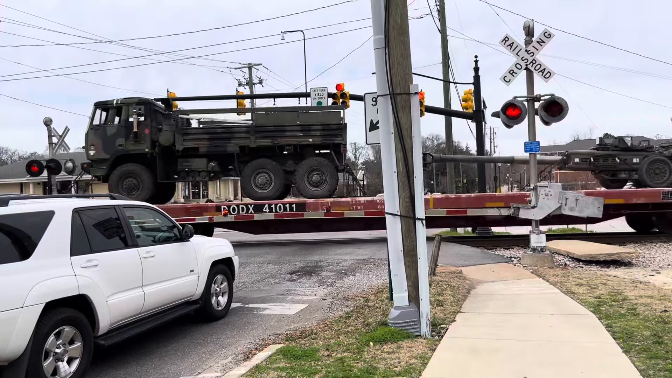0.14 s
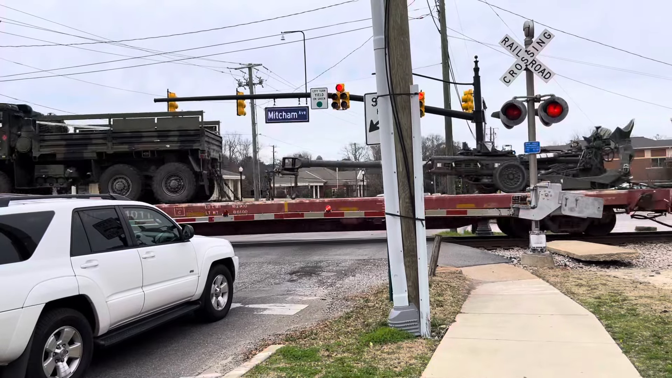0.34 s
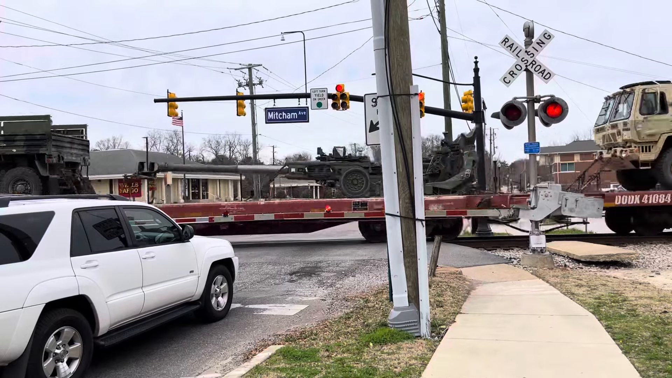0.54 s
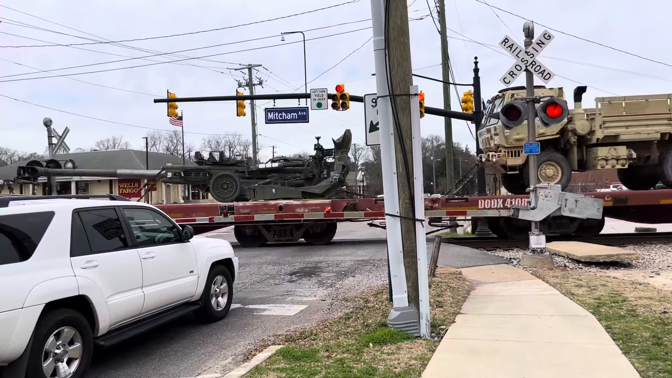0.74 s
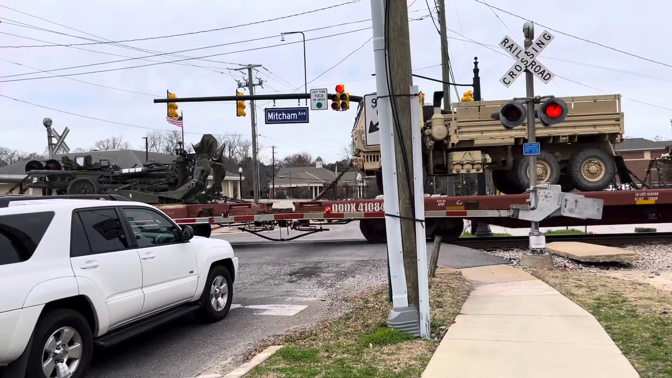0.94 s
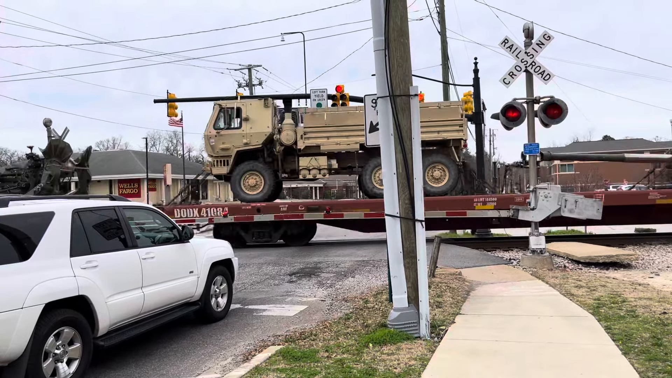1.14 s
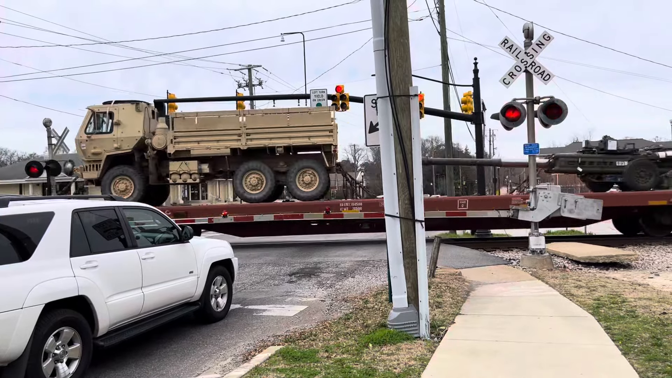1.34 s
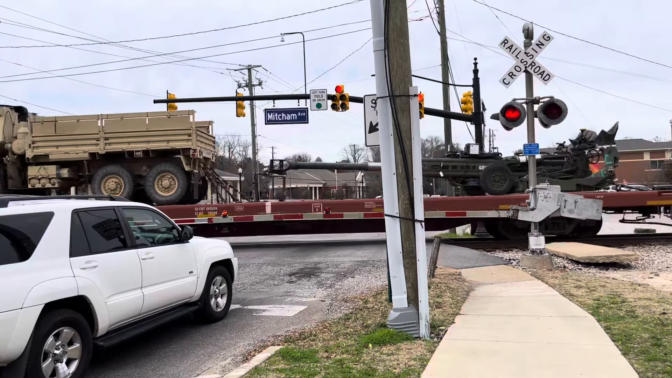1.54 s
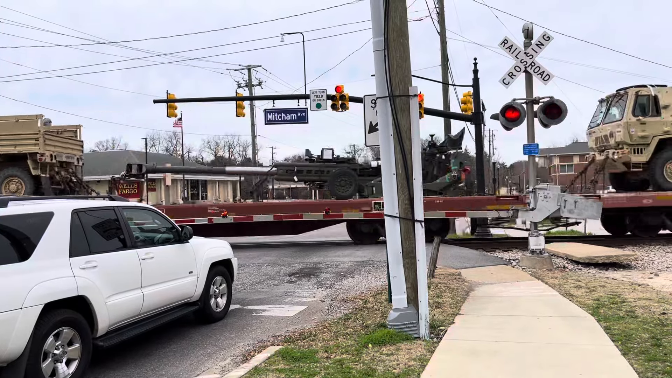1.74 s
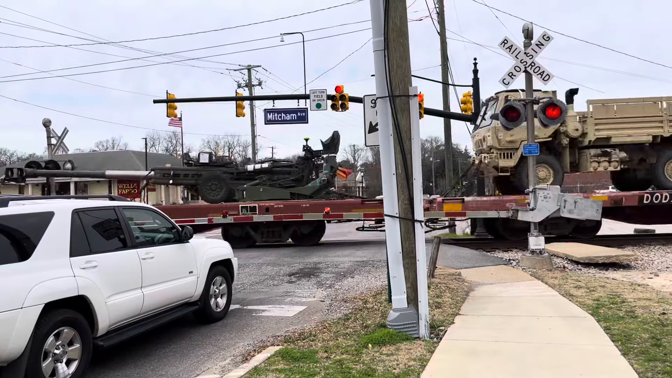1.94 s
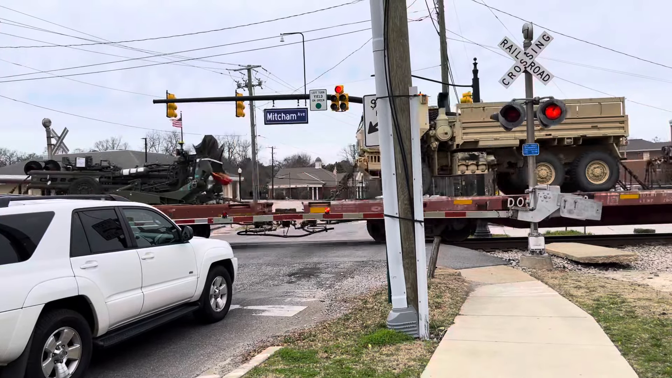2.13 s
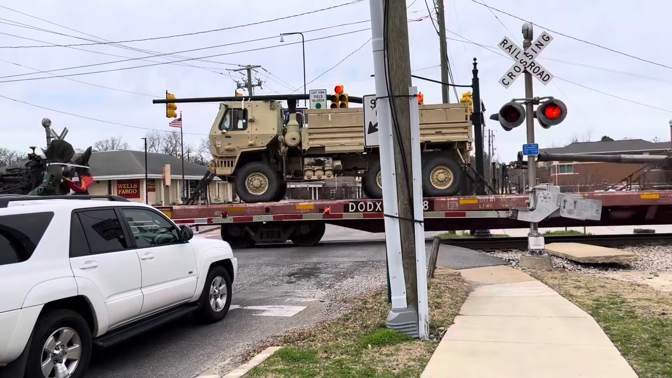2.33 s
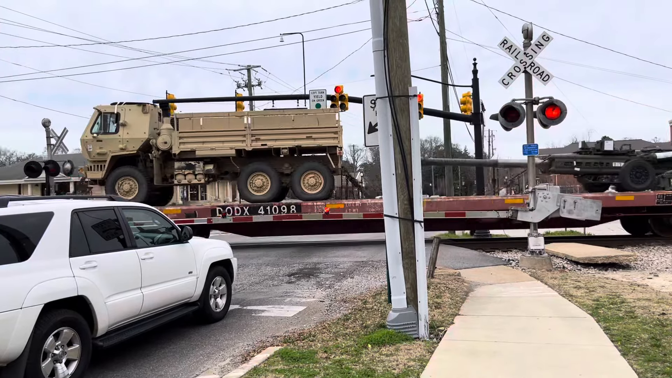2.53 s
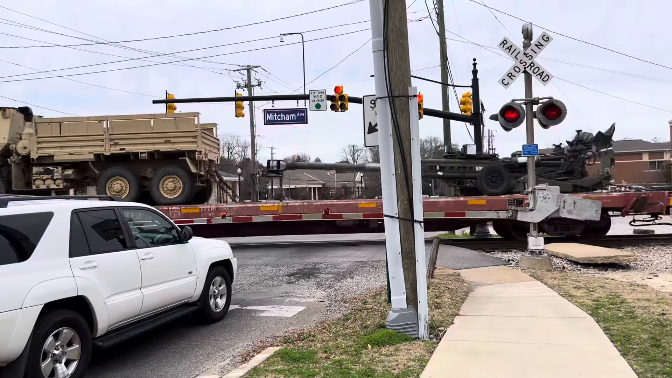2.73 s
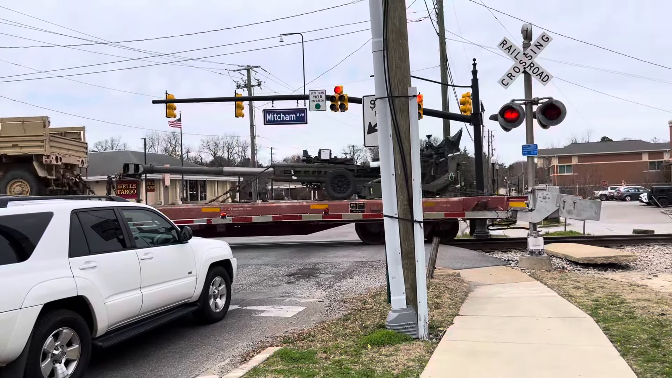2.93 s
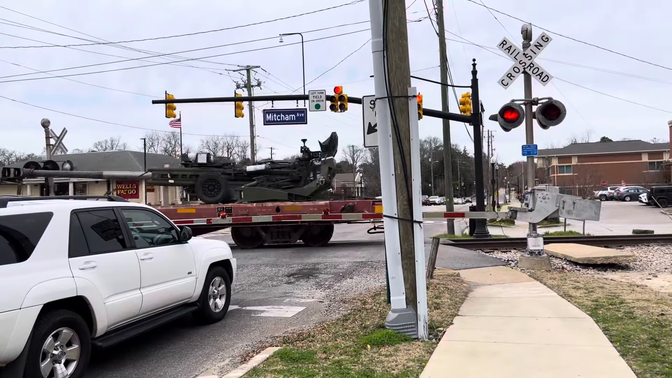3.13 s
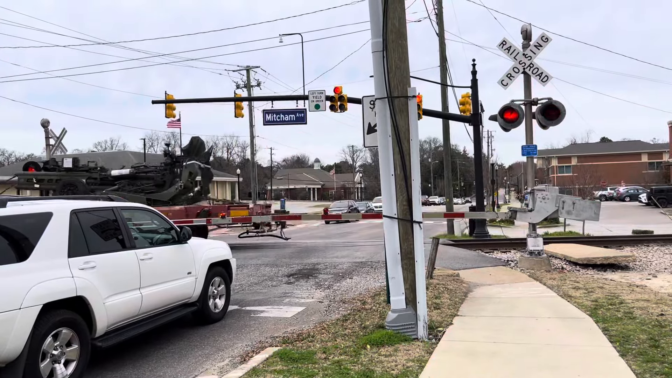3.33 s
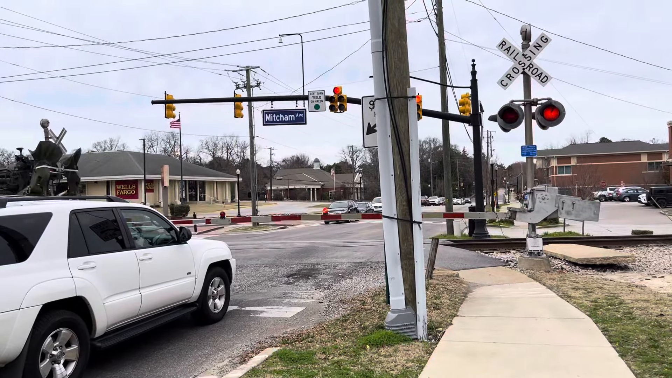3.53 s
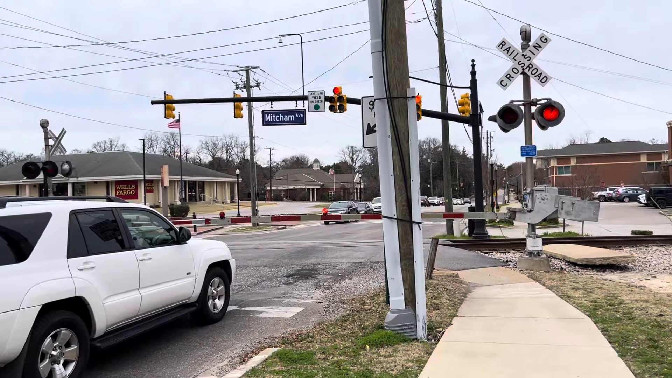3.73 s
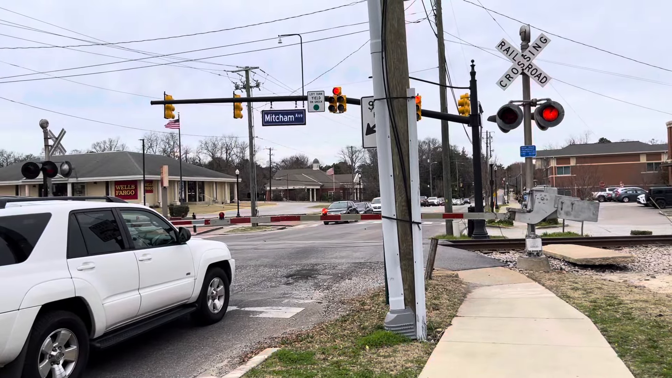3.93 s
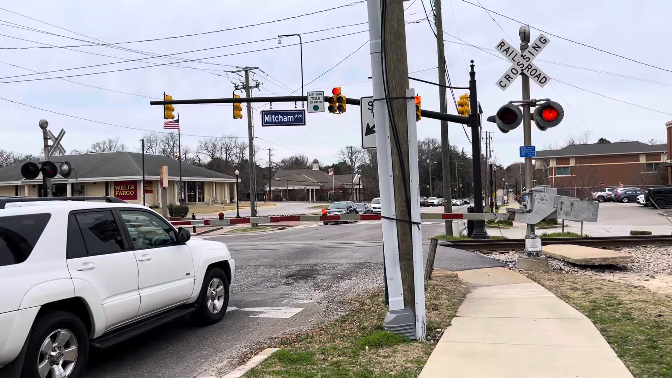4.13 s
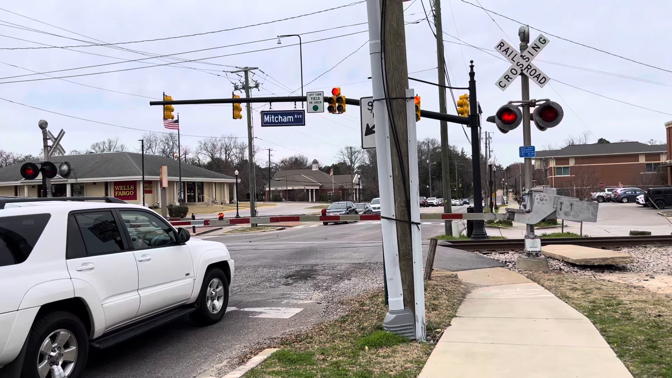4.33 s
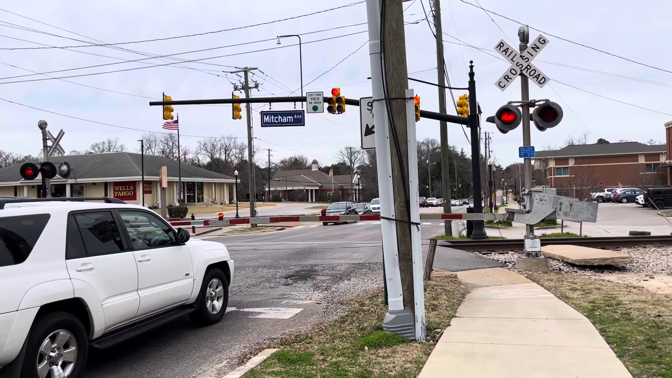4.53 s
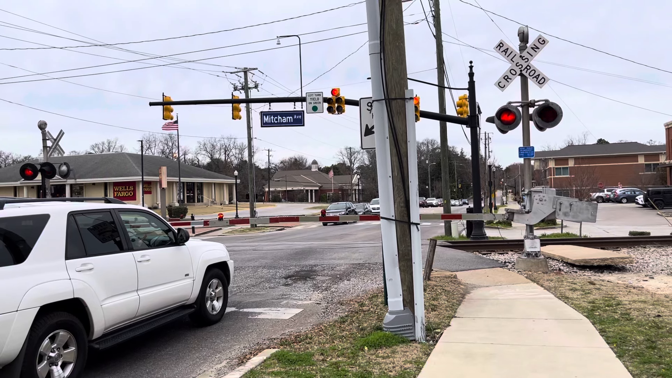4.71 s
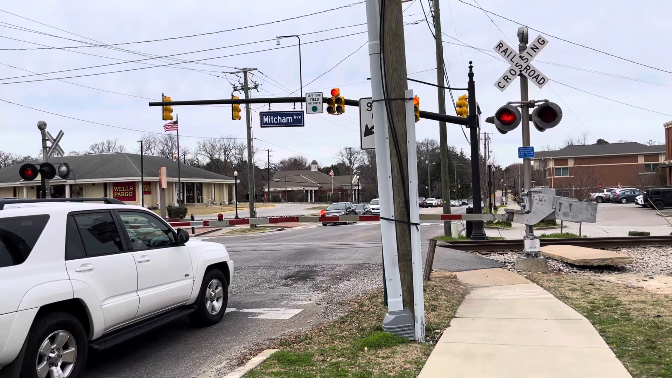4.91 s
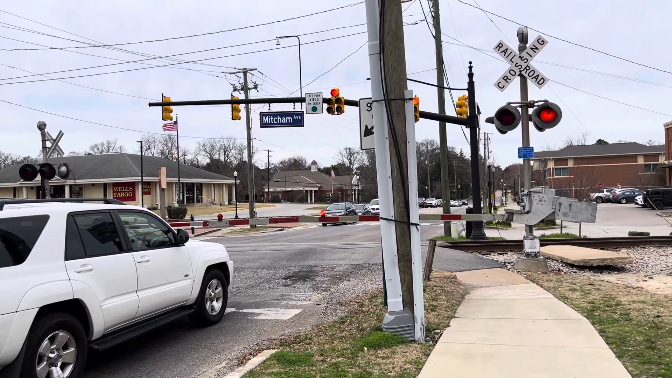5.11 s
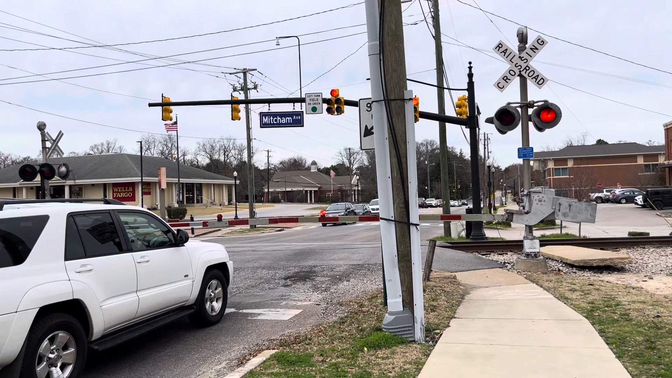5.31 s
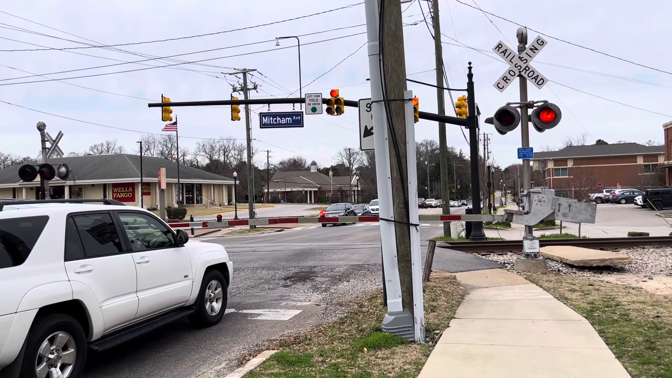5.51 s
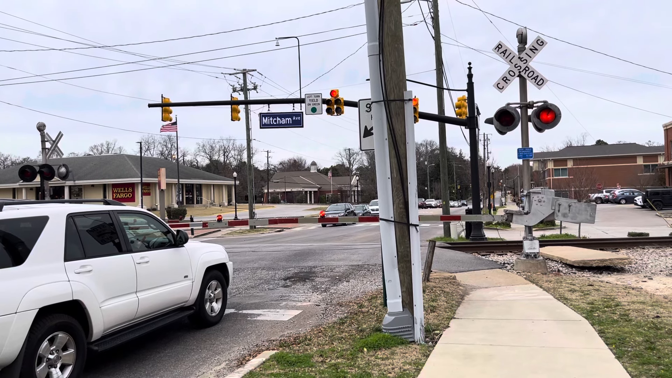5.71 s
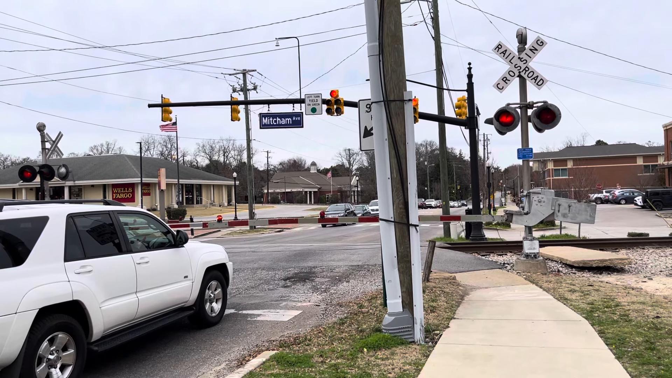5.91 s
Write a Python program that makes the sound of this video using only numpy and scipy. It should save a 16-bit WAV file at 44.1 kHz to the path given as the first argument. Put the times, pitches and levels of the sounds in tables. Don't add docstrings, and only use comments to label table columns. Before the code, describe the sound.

Beside a level crossing, loaded flatcars pass close by with a broad, deep rolling roar, booming car bodies, rattling gear, joint knocks and brief flange squeals. A mechanical bell strikes four to five times a second, partly masked. After about three and a half seconds the last car leaves, the roar sinks away to the left side of the scene and the bell stands clear. Outdoor stereo phone pickup near the track.

```python
import sys
import numpy as np
from scipy import signal
from scipy.fft import rfft, irfft, next_fast_len
from scipy.io import wavfile

SR = 44100
rng = np.random.default_rng(int(sys.argv[2]) if len(sys.argv) > 2 else 0)


def generate_wav(sig):
    pcm = np.round(np.clip(np.atleast_2d(sig).T, -1, 1) * 32767).astype(np.int16)
    wavfile.write(sys.argv[1], SR, pcm)


def boost(x):
    u = np.asarray(x, float) / 20
    return 10 ** u


N = 267239
T = np.arange(N) / SR
PAD = next_fast_len(N + 4096)
HZ = np.arange(PAD // 2 + 1) * SR / PAD


def in_time(rows):
    s, *columns = np.transpose(rows)
    return [np.interp(T, s, c) for c in columns]


def rms_one(x):
    return x / np.sqrt(np.mean(x ** 2) + 1e-20)


def drift(rate_hz):
    r = np.exp(-80 * np.pi * rate_hz / SR)
    noise = rng.standard_normal(N // 40 + 2002)
    slow = signal.lfilter([1], [1, -2 * r, r * r], noise)[2000:]
    return np.interp(np.arange(N) / 40, np.arange(len(slow)), rms_one(slow))


def ring(x, hz, t60_s):
    r = boost(-60 / (t60_s * SR))
    w = 2 * np.pi * hz / SR
    return signal.lfilter([0, np.sin(w)], [1, -2 * r * np.cos(w), r * r], x + 1e-18)


def colour(points):
    hz, level_db = np.transpose(points)
    return boost(np.interp(np.log(HZ + 1), np.log(hz), level_db, right=-130))


def ports(direct, scattered, table):
    hz, alike, lead, pan_db = np.transpose(table)
    alike = np.interp(HZ, hz, np.clip(alike, 0, 1))
    lead = np.interp(HZ, hz, lead)
    pan_db = np.interp(HZ, hz, pan_db)
    side = np.array([[1], [-1]])
    mix = np.sqrt((1 + alike) / 2) * direct + side * np.sqrt((1 - alike) / 2) * scattered
    return irfft(mix * boost(side * pan_db / 2) * np.exp(.5j * side * lead), PAD)[:, :N]


def swells(rows, half_width_s):
    rows = np.array(rows)
    bells = np.exp(-.5 * ((T[::64, None] - rows[:, 0]) / half_width_s) ** 2)
    return [np.interp(T, T[::64], c) for c in (bells @ rows[:, 1:]).T]


def wavering(rows, wobble_hz, flutter_db):
    hz, level_db = in_time(rows)
    fade = np.clip(np.minimum(T - rows[0][0] + 0.0099, rows[-1][0] - T) / 0.076, 0, 1)
    phase = 2 * np.pi * np.cumsum(hz + wobble_hz * drift(8.2)) / SR
    return np.sqrt(2) * fade * boost(level_db + flutter_db * drift(4.6)) * np.sin(phase)


MODE_HZ = [3212, 4580, 4974, 5370, 7146, 1497, 2598, 3873, 5050, 5865, 6223, 6320, 7058, 7542, 7967, 8952,
           9345, 9895, 10410, 10760, 11010, 11850, 12095, 12240, 13380, 14880, 6659, 8088, 8311, 9270, 9550,
           10016, 11310, 11700, 13260, 14030, 14530, 15050]
# level_db (over the blow), t60_s
MODE_RINGS = [(12, 0.21), (13, 0.12), (3.5, 0.27), (24.5, 0.135), (20.5, 0.18), (6.5, 2.25), (-4, .35),
              (0.5, 0.33), (5, 0.24), (-8, .2), (-3, 0.27), (-5, 0.24), (1, 0.27), (1, 0.3), (-3, .25),
              (7.5, 0.22), (-3, 0.26), (3.5, 0.22), (-6, .2), (-2, 0.3), (0.5, 0.33), (-11, 0.3), (4, 0.27),
              (4, 0.23), (-6, 0.3), (-16, .2), (-1, .25), (0, .25), (3, .28), (-7, .22), (-14, .22),
              (-4, .25), (-16, .22), (-12, .25), (-9, .28), (-13, .25), (-8, .28), (-15, .25)]
# start_s, level_db, brightness_db_per_octave, off_spot_db, extra_5khz_pair_db
STRIKES = [(0.009, -59, -1, -1, 0), (0.213, -53.5, -12, 12, -1), (0.45, -70, -18, -13, 0),
           (0.656, -53, -11, -16, 0), (0.876, -55, -13, -18, 5), (1.093, -64, 25, 4, 0),
           (1.335, -47.5, -4, 0, 1), (1.555, -75, -15, -17, 0), (1.789, -55, 2, -6, -2),
           (2.021, -50.5, -1, 7, 0), (2.226, -51.5, 6, 4, -9), (2.425, -47, -7, 1, 3),
           (2.649, -62, 19, 3, -4), (2.858, -52, -10, 0, -13), (3.085, -56, -2, 6, 4),
           (3.3, -54, -2, -3, 2), (3.516, -55, -6, 10, 0), (3.709, -56.5, -16, 4, 1),
           (3.925, -54.5, -6, -10, 4), (4.13, -62, 5, 11, 3), (4.367, -59, -11, 0, -1),
           (4.591, -58.5, -6, -3, 0), (4.827, -60, -5, 7, -5), (5.055, -65, -9, -15, 4),
           (5.291, -54.5, -6, -3, 1), (5.505, -59.5, -4, -11, 3), (5.717, -50, -6.5, -4.5, 10.5),
           (5.952, -63.5, -21, 6, -6)]
OFF_SPOT = [0.024, -0.26, 0.34, 0.6, -0.16]
LEAD_DB = [2, 1, 1.5, 4, 4]
LEAD_FILL = [.1, .1, .3, .92, .92]
# extra_7100hz_db, extra_3900hz_db, extra_tick_db
CLEAR_BLOWS = [(-6, 7, 2), (-1, 6, -2), (-5, 5, 6), (-2, 6, -2), (-13, -13, 5), (-2, 6, 9), (3, 8, 3),
               (-3, 4, 0), (-5, -2, 4), (-2, 4, 1), (0, -2, -1), (5, -3, 1)]
# delay_s, level_db
GONG_ECHOES = [
    (.009, -8),
    (.021, -11),
]
SCREEN_DB = -3.5


def gong():
    fill_t60_s, fill_slope, blow_scatter_db, shimmer_db = .125, 0.67, 3.5, 2.4
    upper_db, upper_t60_share = 1.5, .8
    tick_loss, tick_db = 0.67, 13.0
    rows, clear = np.array(STRIKES), np.array(CLEAR_BLOWS)
    at, out = (rows[:, 0] * SR).astype(int), np.zeros(N)
    octaves = np.log2(np.array(MODE_HZ[:5]) / 5000)
    lead_db = rows[:, 1:2] + LEAD_DB + np.outer(rows[:, 2], octaves) + np.outer(rows[:, 3], OFF_SPOT)
    whole_db = 10 * np.log10(np.mean(boost(2 * lead_db[:, 1:]), axis=1, keepdims=True))
    lead_db[:, 2] += rows[:, 4]

    strength_db = whole_db + rng.normal(0, blow_scatter_db, (len(rows), len(MODE_RINGS)))
    strength_db[:, :5] = lead_db
    strength_db[:, 5] = -40.0
    strength_db[:, 7] = lead_db[:, 1]
    strength_db[-12:, [4, 7]] += clear[:, :2]
    strength_db[:, 8] = lead_db[:, 2]
    strength_db[:, 14:] -= 2.5
    strength_db[-12:, 9:] -= .6 * clear[:, 2:]
    strength_db[:-12, 9:] += SCREEN_DB

    shimmer = [boost(shimmer_db * drift(45.0)) for _ in range(3)]
    for k, (hz, (level_db, t60_s)) in enumerate(zip(MODE_HZ, MODE_RINGS)):
        if k > 8:
            level_db += upper_db
            t60_s = max(t60_s * upper_t60_share, 1.35 * fill_t60_s)
        blows = np.zeros(N)
        blows[at] = boost(strength_db[:, k] + level_db) * np.sign(np.cos(7 * k))
        share = np.clip(LEAD_FILL[k] if k < 5 else fill_slope * hz / 10000, 0, .95)
        tone = ring(blows, hz, t60_s) - share * ring(blows, hz, fill_t60_s)
        out += tone * shimmer[k % 3]

    ticks = np.zeros(N)
    ticks[at] = boost(lead_db[:, 1] - tick_loss * rows[:, 4] + tick_db)
    ticks[at[-12:]] *= boost(clear[:, 2])
    scuff = signal.lfilter([1], [1, -.996], ticks) * rng.standard_normal(N)
    band = signal.butter(1, [3000, 9000], "band", fs=SR, output="sos")
    out = out + signal.sosfilt(band, scuff)
    echoes = [boost(level_db) * np.interp(T - lag, T, out, left=0) for lag, level_db in GONG_ECHOES]
    return out + sum(echoes)


# start_s, level_db
WHINE = [
    (2.72, -68),
    (2.85, -62),
    (3.1, -60),
    (3.3, -62),
    (3.5, -65),
    (4.4, -66),
    (4.87, -70),
    (4.95, -90),
]


def rail_whine():
    rows = [(s, 12272, level_db) for s, level_db in WHINE]
    return wavering(rows, wobble_hz=7.0, flutter_db=3.0)


# start_s, pitch_hz, level_db
THRUM = [
    (0.0, 60, -23),
    (0.1, 56, -26),
    (0.25, 58, -48),
    (0.31, 60.43, -30),
    (1.05, 59.45, -29),
    (2.04, 60.24, -44),
    (2.15, 65.2, -26),
    (2.6, 61.14, -41),
    (3.0, 63.26, -28.5),
    (3.6, 59.4, -36),
]


def axle_thrum():
    return wavering(THRUM, wobble_hz=2.55, flutter_db=2.0) * boost(2.5)


# start_s, peak_db, pitch_hz
RATTLES = [(0.0883, -16, 1320), (0.1625, -8, 2230), (0.46, -16, 1920), (0.6795, -13, 1940),
           (0.7594, -16, 1980), (1.17, -19, 2230), (1.7634, -17, 1490), (2.25, -11, 1620),
           (2.3476, -27, 1694), (2.398, -8.5, 1510), (2.4744, -20, 1410), (2.5687, -17, 1660),
           (2.654, -9, 1670), (2.739, -49, 1570), (2.8424, -7, 1510), (2.9179, -7, 1580), (2.84, -10, 2112),
           (3.1397, -18, 1600)]


def rattles():
    level_db, t60_s = -8.5, 0.066
    out, span = np.zeros(N), np.arange(SR // 8) / SR
    band = signal.butter(1, [1200, 5000], "band", fs=SR, output="sos")
    for s, peak_db, hz in RATTLES:
        noise = rng.standard_normal(len(span))
        metal = rms_one(ring(noise, hz, 0.017))
        broad = boost(-11) * rms_one(signal.sosfilt(band, noise))
        decay = boost(peak_db + level_db - 60 * span / t60_s)
        at = int(s * SR)
        out[at:at + len(span)] += decay * (metal + broad) / 2
    return out


# start_s, peak_db, pitch_hz
BOOMS = [(0.157, -4.5, 199.4), (0.358, -7, 195), (0.466, -7.5, 159), (0.745, -6, 174), (0.823, -7, 265),
         (0.966, -8, 277), (1.083, -17, 242), (1.254, -5, 305), (1.51, -3, 263), (1.657, -11.5, 246),
         (1.725, -19, 278), (1.828, -3, 309), (1.879, -3, 240), (2.251, -14, 254), (2.431, -9, 304),
         (2.641, -12, 230), (2.696, -5, 256), (2.841, -6, 255), (3.014, -3.5, 257), (5.428, -15, 85.6),
         (5.535, -13, 114), (5.646, -15, 88), (5.86, -11, 70.4)]


def booms():
    boom_db, t60_s, rise_s = -7.5, 0.11, 0.022
    out = np.zeros(N)
    for s, peak_db, hz in BOOMS:
        blow = np.zeros(SR // 4)
        blow[0] = boost(peak_db + boom_db)
        tone = np.zeros(len(blow))
        for ratio, level_db in [(1, 2), (1.7, -5)]:
            swell = ring(blow, hz * ratio, t60_s) - ring(blow, hz * ratio, rise_s)
            tone += boost(level_db) * swell
        at = int(s * SR)
        out[at:at + len(blow)] += tone[:N - at]
    return out


# start_s, peak_db, thud_db
JOINTS = [(0.458, -4.5, -21), (0.584, -5, -21), (0.855, -26, -21), (0.903, -16, -18), (1.368, -20, -20),
          (1.446, -9, -14), (1.549, -41, -12), (1.594, -8, -18), (2.672, -14, -5), (2.84, -29, -30),
          (3.112, -9, -26), (3.39, -31, -10), (3.605, -12, -32), (3.692, -8, -28), (3.757, -10, -37),
          (3.813, -6.5, -23), (3.969, -13, -24), (4.126, -14, 10), (4.221, -16, -20), (4.282, -9.5, -37),
          (4.355, -15, -37), (4.51, -17, -35), (4.621, -15, -38), (4.747, -12, -38), (4.819, -17, -35),
          (4.903, -12, -35), (4.974, -14, -38), (5.04, -29, -39), (5.088, -19, -35), (5.158, -14.5, -35)]


def knocks():
    rows = np.array(JOINTS)
    at, out = (rows[:, 0] * SR).astype(int), np.zeros(N)
    chance_db = rng.normal(0, 2.0, (len(rows), 5))
    # pitch_hz, level_db, t60_s, driving column of JOINTS (1 peak, 2 thud)
    modes = [(937, -10.5, 0.029, 1), (1510, -26.0, 0.028, 1), (2060, -22.5, 0.09, 1),
             (261.0, -31.0, 0.14, 2), (410, -41.0, 0.024, 2)]
    for k, (hz, level_db, t60_s, column) in enumerate(modes):
        blows = np.zeros(N)
        blows[at] = boost(rows[:, column] + level_db + chance_db[:, k])
        out += ring(blows, hz, t60_s) - ring(blows, hz, t60_s / 5)
    return out


# start_s, length_s, pitch_hz, width_hz,
# level_db
SQUEALS = [(.06, .07, 1450, 200, -38), (.44, .06, 1950, 150, -42), (.64, .08, 3800, 150, -47),
           (.78, .25, 3900, 140, -52), (1.3, .06, 7250, 150, -55), (1.46, .06, 3950, 100, -46),
           (1.65, .04, 5750, 150, -49), (1.72, .28, 3400, 70, -51), (1.83, .045, 10860, 200, -48),
           (.8, .2, 960, 60, -36), (.47, .05, 11800, 1200, -55), (1.87, .14, 6300, 80, -53),
           (2.03, .08, 12500, 1500, -54), (2.2, .12, 3750, 70, -45), (2.06, .04, 8900, 300, -52),
           (2.36, .2, 6050, 60, -52), (2.74, .35, 1480, 300, -40), (2.84, .04, 3480, 60, -42),
           (2.98, .05, 3480, 60, -41), (3.06, .045, 2620, 100, -43), (3.135, .04, 3450, 70, -43),
           (3.19, .05, 3400, 120, -48), (2.86, .38, 3480, 40, -51), (2.99, .04, 2600, 120, -46),
           (3.05, .035, 2330, 120, -45), (3.12, .05, 3900, 120, -48), (3.21, .03, 3900, 120, -46),
           (2.76, .035, 2050, 200, -43), (2.865, .035, 2080, 150, -43), (2.88, .06, 1550, 250, -40),
           (.23, .12, 2280, 150, -45), (.45, .06, 500, 60, -30), (1.08, .08, 500, 60, -31),
           (.93, .05, 490, 60, -32), (.97, .07, 320, 70, -25), (1.27, .09, 320, 70, -25),
           (4.03, .17, 560, 200, -38), (4.95, .3, 1879, 25, -60), (5.4, .2, 1879, 25, -62),
           (5.7, .3, 1879, 25, -58), (.05, .08, 2150, 60, -43),
           (.2, .04, 9900, 250, -56), (.2, .04, 12100, 500, -56), (.47, .05, 11550, 200, -54),
          (.47, .05, 12300, 200, -56), (.44, .04, 11100, 200, -57), (.67, .06, 10900, 300, -55),
          (.66, .07, 12000, 1500, -56), (.88, .12, 11550, 120, -57), (.9, .09, 12500, 500, -56),
          (1.22, .04, 12800, 500, -57), (1.33, .05, 12300, 700, -57), (1.74, .08, 12800, 900, -57),
          (1.98, .05, 13000, 250, -56), (2.04, .04, 12900, 500, -53), (2.21, .05, 12200, 300, -56),
          (2.33, .05, 12400, 300, -57), (2.42, .06, 12600, 600, -57), (2.63, .04, 12300, 900, -58)]


def squeals():
    out = np.zeros(N)
    for start, length, hz, width, level_db in SQUEALS:
        at, t60_s = int(start * SR), 2.2 / width
        noise = rng.standard_normal(SR // 2)
        tone = ring(ring(noise, hz, t60_s), hz, t60_s)
        tone = rms_one(tone[-int(length * SR):])
        out[at:at + len(tone)] += boost(level_db + 5.0) * tone * np.sqrt(np.hanning(len(tone)))
    return out


# start_s, level_db
ROAR = [(0.0, -17), (0.2, -22.5), (0.3, -23.5), (0.45, -20.5), (0.8, -23), (0.99, -20.5), (1.08, -21),
        (1.4, -17.5), (2.0, -18.5), (2.2, -15), (2.28, -18.5), (2.36, -14.5), (3.15, -19.5), (3.5, -23),
        (3.85, -25), (4.12, -26.5), (4.9, -31), (6.06, -38.5)]
# start_s, power_share_0_to_1
NEAR_SHARE = [
    (0, 0.93),
    (3.2, 1),
    (3.5, 0.19),
    (3.9, 0.18),
    (4.5, 0.08),
    (6.1, 0.01),
]
FOLLOWS = [0.22, 0.84, 0.31, 0.38]
ALONGSIDE_DB = [1.7, .1, .3, 4]
DRIFT_DB_PER_S = [-0.17, -0.23, 0.0049, 0.72]
# centre_s, level_db
GROUND_SWELLS = [(.07, 1.5), (.29, 5.5), (.52, 8), (.74, 3), (.86, 1.5), (1.47, -2.5), (1.84, 0.5), (2.28, -8.5),
                 (2.53, 1.5), (3.19, 2.5), (3.59, 6), (4.1, -7), (4.25, 5), (4.34, -3), (5.33, 6), (5.55, -0.5),
                 (5.65, 4), (5.87, 7.5), (6.05, 0.5)]
# centre_s, rail_db, wheel_db
BOGIES = [(.02, 0.5, 3), (.15, 2.5, 3), (.48, 1.5, 3), (.7, 1.5, 3.5), (.85, 0, 3), (1.45, 0, 0),
          (1.8, 2.5, 2.5), (2.05, 3, 3), (2.22, 3, 1), (2.39, 0.5, 0.5), (2.53, 1.5, -1), (2.82, -0.5, -2),
          (3.19, 1, 2), (3.68, 3.5, 0.5), (4.05, 1, 2.5), (4.25, -0.5, 1), (4.51, 1.5, 0), (5.55, -0.5, 1)]


def zone_levels():
    roar_db, share = in_time(ROAR)[0], in_time(NEAR_SHARE)[0]
    levels = np.outer(FOLLOWS, roar_db) + np.outer(ALONGSIDE_DB, share) + np.outer(DRIFT_DB_PER_S, T)
    levels[0] += swells(GROUND_SWELLS, half_width_s=0.073)[0]
    levels[2:] += swells(BOGIES, half_width_s=0.077)
    return levels


def flecks(count, level_db, spread_db):
    out = np.zeros(N + SR)
    for when, pitch, length, strength in rng.random((count, 4)):
        span = np.arange(int((0.026 + 0.082 * length ** 2) * SR))
        hz = 900 * 14 ** pitch
        tone = np.sin(2 * np.pi * hz * span / SR + 6 * strength) * np.hanning(len(span))
        at = int(when * N)
        out[at:at + len(span)] += tone * boost(level_db + spread_db * strength)
    return out[:N]


ZONE_HZ = [70, 250, 1300, 5000]


def rolling():
    patchy_db, gust_db = 1.7, .8
    levels, gusts = zone_levels(), drift(12.0)
    levels = levels - levels.mean(axis=1, keepdims=True)
    white, out = rfft(rng.standard_normal((4, PAD))), np.zeros((4, N))
    octave = np.log2(HZ + 1)
    for centre in np.arange(5, 14.4, 2 / 3):
        window = np.cos(np.clip((octave - centre) * 1.5, -1, 1) * np.pi / 2)
        zone = np.interp(centre, np.log2(ZONE_HZ), np.arange(4))
        low = min(int(zone), 2)
        level_db = levels[low] + (zone - low) * (levels[low + 1] - levels[low])
        flicker_db = patchy_db * (1 + 0.38 * (centre > 12.9)) * drift(35.0)
        flicker_db += gust_db * zone / 3 * gusts
        out += irfft(white * window, PAD)[:, :N] * boost(level_db + flicker_db)
    out[0] += flecks(count=900, level_db=-17.5, spread_db=10.0) * boost(levels[2])
    return out


# pitch_hz, level_db_per_hz
NEAR_COLOUR = [(30, -12), (60, -0.5), (100, -3), (250, 0), (330, -3.5), (490, -8.5), (650, -16), (970, -15),
               (1220, -23.5), (1500, -18), (1800, -25), (3500, -28.5), (7000, -40.5), (14000, -49),
               (15800, -57)]
# pitch_hz, level_db_per_hz
FAR_COLOUR = [(30, -3), (60, 7.5), (130, 0), (400, -0.5), (650, -9), (970, -10.5), (1220, -18), (1500, -15),
              (1800, -24), (2600, -20), (3050, -24), (3400, -27), (3700, -26.5), (4500, -30.5), (5500, -36),
              (7000, -46.5), (12300, -50), (12800, -68), (13400, -57), (13900, -62), (15800, -65)]
# pitch_hz, likeness_0_to_1, left_lead_rad, left_over_right_db
NEAR_PORTS = [(0, .98, 0, 1.5), (450, .9, -.2, 2.5), (750, .6, -.3, 1), (1200, .15, .6, 4),
              (1500, .3, -2.3, -1), (1800, .6, 0, 5), (2200, .85, .3, 0), (3100, .55, 1.3, 2.5),
              (4200, .6, .6, 3), (5200, .35, .6, 5.5), (5700, .5, -1.2, 3), (7300, .85, -2.4, 1.5),
              (7750, .99, -3.14, .1), (8900, .97, -3.2, 0), (9500, .75, -3.8, 0), (11200, .99, -6.28, 0),
              (13100, .99, -6.3, 0), (13800, .6, -7.9, 0), (14600, .97, -9.4, 0), (22050, .97, -9.4, 0)]
# pitch_hz, likeness_0_to_1, left_lead_rad, left_over_right_db
FAR_PORTS = [(0, .93, 0, 1), (500, .78, .6, 2), (900, .85, 1.7, 5), (1500, .75, 3.3, -3), (1800, .4, 5, 6),
             (2200, .88, 6.3, 0), (2800, .85, 7.8, -1), (3350, .92, 9.4, 2), (3700, .4, 11, 5),
             (4200, .75, 12.7, 5), (5200, .5, 14.1, 5), (5600, .6, 15.9, 2), (6100, .55, 17.7, 2),
             (7300, .85, 16.4, 1), (7750, .99, 15.71, .1), (9200, .97, 15.6, 0), (9800, .7, 14.5, 0),
             (11200, .99, 12.57, 0), (13200, .99, 12.5, 0), (14500, .97, 9.4, 0), (22050, .97, 9.4, 0)]
# pitch_hz, likeness_0_to_1, left_lead_rad, left_over_right_db
GONG_PORTS = [(0, 1, 0, 0), (1500, 1, 3.1, -2), (2600, 1, 6.3, 3), (3200, 1, 8.9, 5), (3870, 1, 11.9, 6),
              (4600, 1, 13.1, 5), (5050, 1, 13.6, 4), (5400, 1, 13.0, 6), (5900, 1, 12.3, 2),
              (7100, 1, 10.7, 1), (8000, 1, 9.4, 0), (9000, 1, 8.7, 0), (11850, 1, 6.28, 0),
              (12800, 1, 6.28, 0), (13400, 1, 5.3, 0), (14900, 1, 3.14, 0), (22050, 1, 3.14, 0)]


def scene():
    share = np.clip(in_time(NEAR_SHARE)[0], 0, 1)
    near_gain, far_gain = np.sqrt(share), np.sqrt(1 - share)
    mast = gong() * boost(SCREEN_DB * share) + rail_whine()
    hits = rattles() + booms() + knocks() + squeals()
    noise = rolling()
    far = rfft(noise[2:] * far_gain, PAD) * colour(FAR_COLOUR) * boost(-11.5)
    far[0] += rfft(hits * far_gain, PAD)
    near = rfft(noise[:2] * near_gain, PAD) * colour(NEAR_COLOUR) * boost(-4.0)
    near[0] += rfft(hits * near_gain + axle_thrum(), PAD)
    return ports(rfft(mast, PAD), 0, GONG_PORTS) + ports(*far, FAR_PORTS) + ports(*near, NEAR_PORTS)


def roll_off(x):
    return signal.sosfilt(signal.butter(12, 15750, fs=SR, output="sos"), x)


def record(dry):
    bass_cut = signal.butter(4, 35, "high", fs=SR, output="sos")
    mix = signal.sosfilt(bass_cut, dry)
    return roll_off(mix)


dry = scene()
out = record(dry)
generate_wav(out)
```